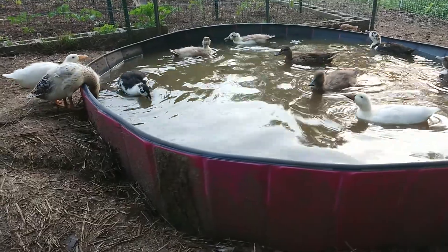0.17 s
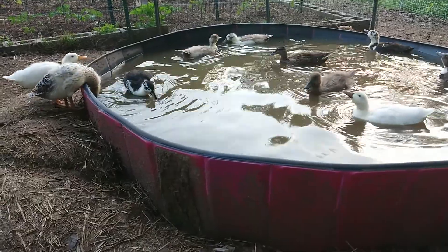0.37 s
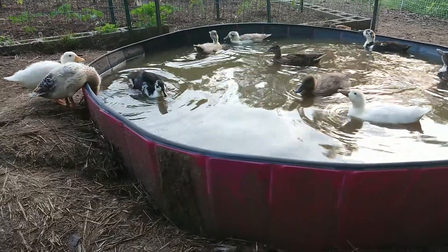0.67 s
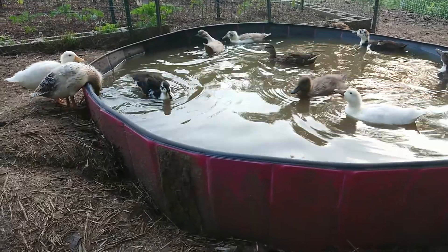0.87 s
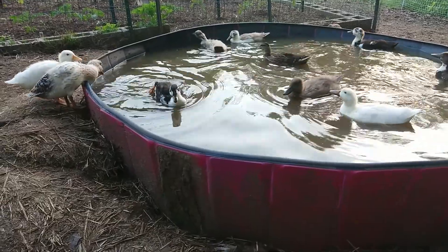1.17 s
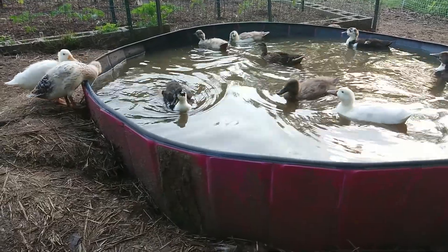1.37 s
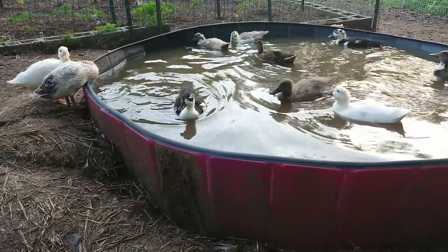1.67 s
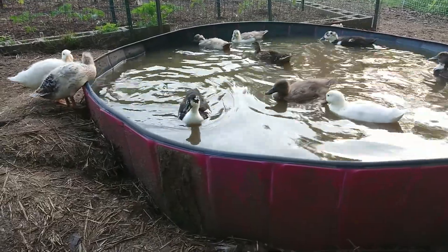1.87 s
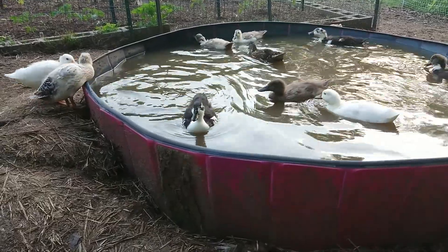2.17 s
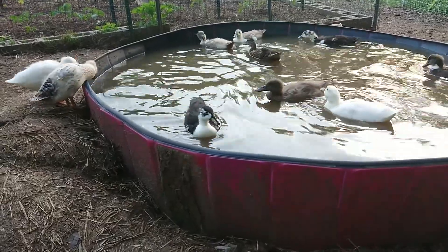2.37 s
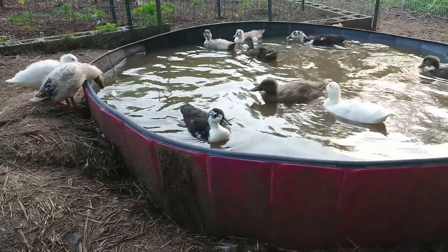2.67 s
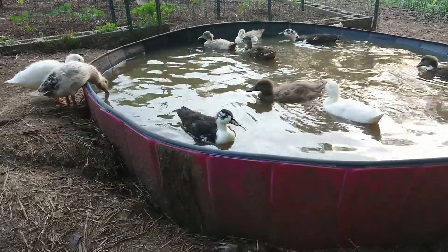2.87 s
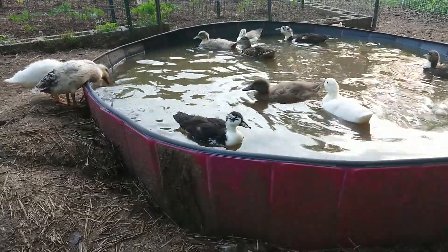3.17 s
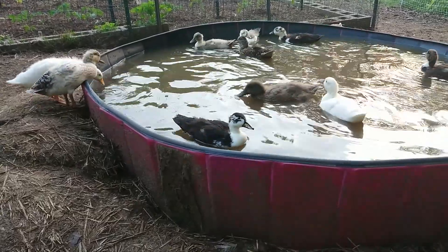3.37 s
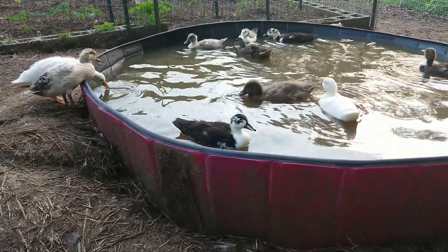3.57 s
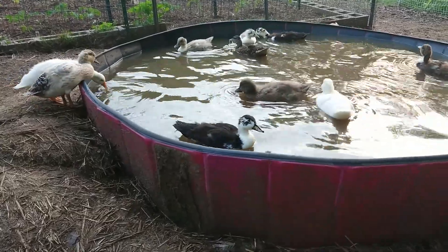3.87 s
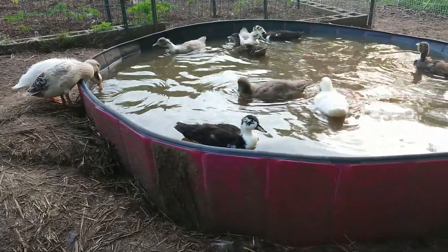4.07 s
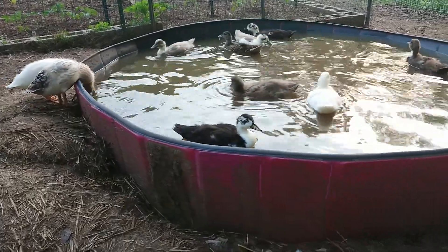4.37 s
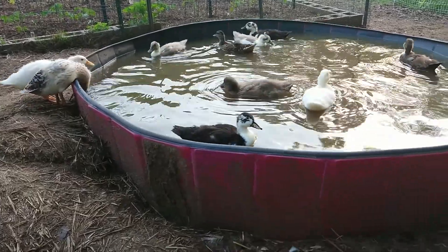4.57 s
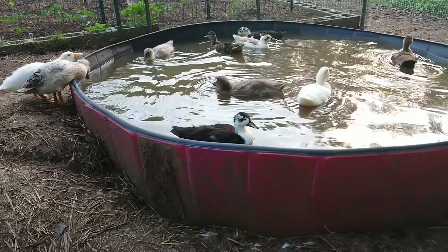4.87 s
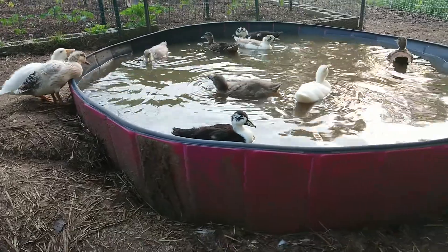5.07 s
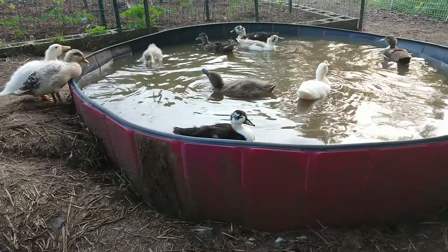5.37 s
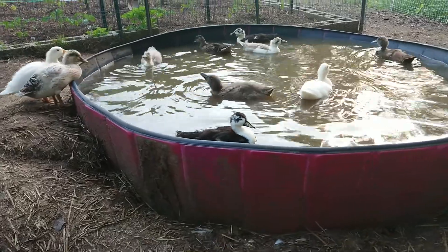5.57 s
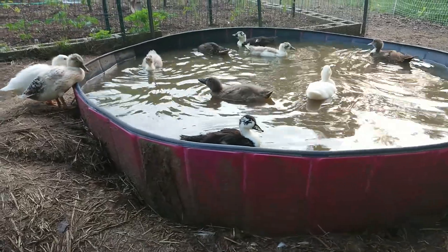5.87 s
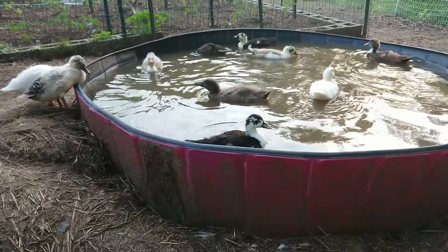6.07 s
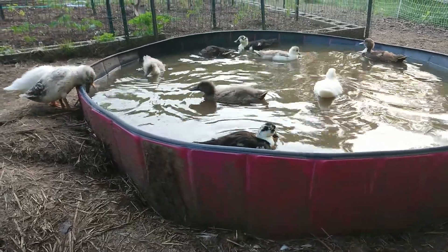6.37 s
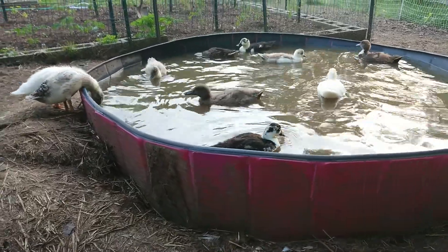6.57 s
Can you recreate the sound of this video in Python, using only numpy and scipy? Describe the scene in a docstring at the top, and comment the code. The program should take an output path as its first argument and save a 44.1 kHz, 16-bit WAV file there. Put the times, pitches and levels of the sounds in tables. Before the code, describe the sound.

Ducks paddle in a backyard pool: low nasal quacks, thin peeps, watery drips and plops, far birds twittering, a low hum and a distant engine passing.

```python
"""Ducks on a backyard pool. From the start a close duck quacks ten times while young ducks peep, water fizzes
and drips, feet stir up plops and far birds twitter, over a low hum, a rumble and a distant engine.
At 2.7 s a farther duck answers with a quick hoarse run, then clucks softly; a songbird trills from 3.4 s.
The engine speeds up after 2.5 s and is loudest near 3.8 s; a low bump follows at 4.1 s. The farther duck's
second run comes at 5 s. At 5.9 s the engine changes gear and climbs again in one short swell."""
import sys
import numpy as np
from scipy import signal
from scipy.fft import rfft, irfft, next_fast_len
from scipy.io import wavfile
from scipy.ndimage import uniform_filter1d

SR = 44100
rng = np.random.default_rng(int(sys.argv[2]) if len(sys.argv) > 2 else 0)


def wrap_up_sound(samples):
    """Save the sound to the file named by the first command line argument, as 16-bit audio."""
    columns = np.atleast_2d(samples).T
    # keep every value between -1 and 1, then stretch to whole-number steps
    tamed = np.clip(columns, -1, 1)
    steps = np.round(tamed * 32767).astype(np.int16)
    wavfile.write(sys.argv[1], SR, steps)


N = 296352
TIME = np.arange(N) / SR


def amp(db):
    """Decibels to gain."""
    return 10 ** (np.asarray(db) / 20)


def unit(x):
    """Scales to rms 1."""
    return x / np.sqrt(np.mean(x ** 2) + 1e-20)


def read(points, hz):
    """Reads a table on a log-frequency axis."""
    f, value = np.transpose(points)
    return np.interp(np.log(hz + 1), np.log(f + 1), value)


def over_time(points):
    """Joins the points of a (time, value) table with straight lines."""
    return np.interp(TIME, *np.transpose(points))


def progress(length):
    """Runs from 0 to 1 over a sound of the given length in seconds."""
    return np.arange(int(length * SR)) / (length * SR)


def phase_of(hz):
    """Adds up a changing pitch into the phase of its wave."""
    return 2 * np.pi * np.cumsum(hz) / SR


def add(mix, s, sound):
    """Mixes a sound in at time s, cutting what falls outside the scene."""
    at = round(s * SR)
    part = mix[max(at, 0):][:max(len(sound) + min(at, 0), 0)]
    part += sound[max(-at, 0):][:len(part)]


def drift(size, hz):
    """Slow random motion of rms 1, up to about hz."""
    span = next_fast_len(size + SR // 4, real=True)
    f = np.fft.rfftfreq(span, 1 / SR)
    smooth = irfft(rfft(rng.standard_normal(span)) * np.exp(-(f / hz) ** 2), span)
    return unit(smooth)[:size]


def above(x, hz):
    """Keeps what lies above hz."""
    return signal.sosfilt(signal.butter(2, hz, "high", fs=SR, output="sos"), x)


def resonate(x, hz, width):
    """A two-pole resonance of gain 1."""
    return signal.lfilter(*signal.iirpeak(hz, hz / width, fs=SR), x)


def glide(x, hz, width):
    """A resonance of gain 1 that follows the curve hz: shift down to zero, smooth, shift back."""
    turn = np.exp(1j * phase_of(hz))
    r = np.exp(-np.pi * width / SR)
    smoothed = signal.lfilter([1 - r], [1, -r], x / turn + 1e-18)
    return 2 * (turn * smoothed).real


def colour(x, points, tilt_db=0, size=2048):
    """Causal filter: every pulse rings with the given spectrum, tilted per octave."""
    hz = abs(np.fft.fftfreq(size, 1 / SR))
    octaves = np.log2(np.clip(hz, 300, 4000) / 1000)
    low_cut = (hz + 1) / np.hypot(hz, 120)
    log_gain = np.log(amp(read(points, hz) + tilt_db * octaves) * low_cut)
    # minimum phase: the ring starts at once and only dies away
    ring = np.fft.ifft(np.exp(np.conj(signal.hilbert(log_gain)))).real[:size // 2]
    return signal.fftconvolve(x, ring)


def scatter(x, decay_s):
    """Early echoes off the water and the pool wall, within 25 ms."""
    t = np.arange(SR // 40) / SR
    taps = rng.standard_normal(len(t)) * np.exp(-t / decay_s) * (t > .001)
    return signal.fftconvolve(x, taps / np.linalg.norm(taps))[:len(x)]


# how long the yard rings: (frequency [Hz], time to fall by 60 dB [s])
YARD_RING = [(200, 0.093), (450, 0.29), (720, 0.25), (950, 0.3), (1600, 0.19), (2700, 0.25), (5000, 0.5),
             (12000, 0.067)]


def yard(x):
    """Pool wall, fence and trees scatter the sound back to both ports."""
    taps = rng.standard_normal((2, SR // 2)) * (rng.random((2, SR // 2)) < .05)
    taps[:, :SR // 250] = 0  # no echo in the first 4 ms
    hz, t, z = signal.stft(taps, SR, nperseg=256)
    fade = amp(-60 * t / read(YARD_RING, hz)[:, None])
    tail = signal.istft(z * fade, SR, nperseg=256)[1]
    return signal.fftconvolve(x[None], tail / np.linalg.norm(tail[0]), axes=1)[:, :N]


def place(x, lead_ms, wet_db):
    """Sound reaches the left port earlier by lead_ms (later if negative); the yard adds its echo."""
    delay = np.exp(-2j * np.pi * np.fft.rfftfreq(N, 1 / SR) * lead_ms / 1000)
    right = irfft(rfft(x) * delay, N)
    return np.array([x, right]) + amp(wet_db) * yard(x)


# how alike sound from all around is at the two ports: (frequency [Hz], likeness [-1 to 1])
PORT_LIKENESS = [(60, 1), (300, 0.76), (700, 0.45), (1500, -0.31), (3000, -0.19), (5000, 0.77),
                 (9000, -0.15)]


def diffuse(points, patchy_db, size=1024):
    """Noise from all around, with drifting patches in time and frequency."""
    frames, hz = N // (size // 4) + 5, np.fft.rfftfreq(size, 1 / SR)
    a, b, c, d, patches = rng.standard_normal((frames, size // 2 + 1, 5)).T
    patches = uniform_filter1d(patches, size=7, axis=0)
    patches = unit(uniform_filter1d(patches, size=6, axis=1))
    same = np.clip(read(PORT_LIKENESS, hz), -1, 1)[:, None]
    left, other = a + 1j * b, c + 1j * d
    z = np.array([left, same * left + np.sqrt(1 - same ** 2) * other])
    z *= amp(read(points, hz)[:, None] + patchy_db * patches)
    return unit(signal.istft(z, nperseg=size, noverlap=size * 3 // 4)[1][:, :N])


def engine(overtone_db=-8):
    """One droning tone that nears, speeds up, fades, and after a gear change climbs again with its octave."""
    # it holds its pitch, then speeds up ever faster
    start_hz, speed_up_s, speed_up_hz_per_s2 = 168.4, 2.5, 3.95
    hz = start_hz + speed_up_hz_per_s2 * np.maximum(TIME - speed_up_s, 0) ** 2
    # it is loudest as it passes
    pass_s, pass_db, nearing_db_per_s, leaving_db_per_s = 3.79, -49, 6.5, 7
    db = pass_db - np.maximum(nearing_db_per_s * (pass_s - TIME), leaving_db_per_s * (TIME - pass_s))
    # it eases off before the gear change
    ease_s, ease_db_per_s = 5.4, 17.5
    db = db - ease_db_per_s * np.maximum(TIME - ease_s, 0)
    # then it climbs again from lower down in one short swell
    shift_s, shift_hz, climb_hz_per_s, climb_db = 5.9, 109, 100, -62
    since = TIME - shift_s
    phase = phase_of(np.where(since < 0, hz, shift_hz + climb_hz_per_s * since))
    gain = np.where(since < 0, amp(db), amp(climb_db) * np.sin(np.pi * since / since[-1]))
    tone = unit(np.sin(phase)) + amp(overtone_db) * (since > 0) * unit(np.sin(2 * phase))
    return uniform_filter1d(gain, size=2000) * amp(1.2 * drift(N, 19)) * tone


# tone colour of the quiet garden air, with the narrow band near 4.3 kHz: (frequency [Hz], relative level [dB])
GARDEN_COLOUR = [(350, -6.5), (600, -3.5), (1200, -3.5), (2200, -9), (3600, -15), (4300, 7), (4800, -5),
                 (5400, -2), (6200, -59), (7200, -47), (9000, -79.5), (13000, -89.5), (16000, -52)]
# tone colour of the low rumble: (frequency [Hz], relative level [dB])
RUMBLE_COLOUR = [(15, -61), (30, -32), (45, -24), (64, 1.5), (85, -1.5), (108, 0.5), (140, -5), (220, -9.5),
                 (300, -16.5), (450, -19.5), (900, -48.5)]


def background(garden_db=-62, rumble_db=-58.5, easing_db_per_s=0.25, hum_db=-67, hum_hz=65):
    """Garden air and a narrow strong band near 4.3 kHz, an easing rumble, a wavering hum and the far engine."""
    hum = unit(np.sin(phase_of(hum_hz + 2.56 * drift(N, 7.8))))
    hum = amp(hum_db + 2.2 * drift(N, 5.5)) * hum
    rumble = diffuse(RUMBLE_COLOUR, patchy_db=2.5, size=4096)
    rumble = amp(rumble_db - easing_db_per_s * TIME) * rumble
    air = amp(garden_db) * diffuse(GARDEN_COLOUR, patchy_db=2)
    return air + rumble + place(engine() + hum, lead_ms=-0.51, wet_db=-10.0)


# a far bird's phrases: (time [s], level [dB])
BIRD_PHRASES = [(.02, -50.5), (.41, -58.5), (.865, -53), (1.355, -51), (1.695, -53), (2.395, -51.5),
                (2.94, -51.5), (3.25, -51), (3.69, -53), (4.8, -57), (5.39, -53), (5.755, -51.5),
                (6.1, -51), (6.495, -52.5)]
# where each of the three chirps in a phrase starts its fall: (pitch [Hz])
CHIRP_STARTS = [5010, 5140, 5170]


def twitter(crowd_db=-63, crowd_hz=4900, fall_hz=560, length=0.0339):
    """Far birds: one repeats phrases of three falling chirps, over a crowd whose chirps blur into a shimmer."""
    chirp_gap_s, crowd_per_s = .046, 45
    u = progress(length)
    leader, crowd = np.zeros((2, N))

    def chirp(hz):
        """One short falling note that swells and fades."""
        pitch = hz - fall_hz * u + 45 * drift(len(u), 400)
        return np.sin(phase_of(pitch)) * np.sin(np.pi * u) ** 2

    for s, db in BIRD_PHRASES:
        for k, hz in enumerate(CHIRP_STARTS):
            add(leader, s + k * chirp_gap_s, amp(db) * chirp(hz))
    chances = rng.uniform(-1, 1, (int(crowd_per_s * N / SR), 3))
    for k, (late, high, loud) in enumerate(chances):
        add(crowd, (k + late / 2) / crowd_per_s, amp(3 * loud) * chirp(crowd_hz + 250 * high))
    crowd = amp(crowd_db + 2 * drift(N, 4.6)) * unit(place(crowd, lead_ms=0, wet_db=0.5))
    return place(leader, lead_ms=-0.026, wet_db=-5.5) + crowd


# one note of the songbird: (time into the note [s], pitch [Hz], level relative to the trill [dB])
TRILL_NOTE = [(0, 5500, -41), (.012, 6100, -7), (.026, 7000, 0), (.038, 7600, -24), (.05, 6500, -16),
              (.06, 5450, 3.5), (.075, 4850, 10), (.092, 4500, -16)]


def songbird(start=3.417, period=.104, count=14):
    """One up-and-down whistle repeated evenly; the trill swells almost to its last note."""
    trill_db, full_s, swell_db_per_s = -53, 4.67, 8
    at, hz, db = np.transpose(TRILL_NOTE)
    t, out = np.arange(0, at[-1], 1 / SR), np.zeros(N)
    for s in start + period * np.arange(count):
        note = np.sin(phase_of(np.interp(t, at, hz) * (1 + 0.0044 * drift(len(t), 102))))
        level_db = trill_db - swell_db_per_s * max(full_s - s, 0)
        add(out, s, amp(np.interp(t, at, db) + level_db) * note)
    return place(out, lead_ms=-0.097, wet_db=-8)


def bump(s=4.08, length=0.12, hz=98, db=-47):
    """One soft, low bump: a short tone that swells and fades."""
    out, t = np.zeros(N), np.arange(int(length * SR)) / SR
    add(out, s, amp(db) * np.sin(2 * np.pi * hz * t) * np.hanning(len(t)))
    return out


# how hard the water is stirred, before its layers get their own levels: (time [s], level [dB])
WATER_STIR = [(0, -61.5), (.15, -67.5), (.7, -72), (1.35, -67.5), (1.6, -72.5), (2.2, -66.5), (2.75, -69.5),
              (2.98, -66.5), (3.25, -68.5), (3.6, -72.5), (4, -68.5), (4.9, -71.5), (5.25, -70.5),
              (5.8, -77.5), (6.72, -73)]
# tone colour of the stirred water: (frequency [Hz], relative level [dB])
WATER_COLOUR = [(400, -6.5), (1000, -11), (2500, -1), (3700, -3), (4700, -8), (6200, -20.5), (7500, -16),
                (9500, -20.5), (13000, -12.5), (16000, -28)]
# tone colour of spray, used for droplets here and for drips below: (frequency [Hz], relative level [dB])
SPRAY_COLOUR = [(300, -6), (1200, -12), (2800, 1), (4700, 2.5), (6300, -12.5), (9000, -17.5), (13000, -14),
                (16000, -39)]


def water(fizz_db=10, patter_db=2, crackle_db=-8):
    """Paddling and dabbling: a smooth wash, tiny droplets and now and then a sharp little crackle."""
    surge_db, surges_hz = 2.5, 9.7  # the stirring comes in uneven surges
    stir = amp(over_time(WATER_STIR) + surge_db * drift(N, surges_hz))
    wash = diffuse(WATER_COLOUR, patchy_db=2)
    # about 70 droplets a second, a few of them much louder
    drops = (rng.random(N) < 70 / SR) * amp(6.4 * np.minimum(rng.exponential(1, N), 3))
    burst = rng.standard_normal(SR // 200) * np.exp(-np.arange(SR // 200) / 30)
    patter = unit(colour(signal.fftconvolve(drops, burst), SPRAY_COLOUR)[:N])
    # about 6 crackles a second
    pops = (rng.random(N) < 6 / SR) * amp(rng.uniform(-14, 0, N))
    crackle = unit(above(signal.fftconvolve(pops, burst)[:N], 7000))
    near = place(amp(patter_db) * patter + amp(crackle_db) * crackle, lead_ms=0, wet_db=-12)
    return stir * (amp(fizz_db) * wash + near)


def plops(per_s=6, level_db=-52, low_hz=380, high_hz=1500, cycles=7, rise=6):
    """Paddling feet trap larger bubbles: soft, low blips that rise as they die."""
    out, t = np.zeros(N), np.arange(SR // 16) / SR
    for k, (late, high, soft) in enumerate(rng.random((int(per_s * N / SR), 3))):
        hz = low_hz * (high_hz / low_hz) ** high
        fade = np.exp(-t * hz / cycles) * np.minimum(t * hz / 2, 1)
        ring = np.sin(2 * np.pi * hz * (t + rise * t ** 2)) * fade
        add(out, (k + 2 * late - 1) / per_s, amp(level_db - 10 * soft) * ring)
    return place(out, lead_ms=0, wet_db=-3.5)


# drops striking the water: (time [s], level [dB], bubble pitch at first [Hz])
WATER_DRIPS = [(0.239, -29.5, 4490), (0.719, -37, 6160), (1.158, -28.5, 900), (1.163, -34, 1130),
               (1.555, -33, 4290), (1.622, -36, 4230), (1.953, -34.5, 3490), (2.159, -28, 4700),
               (2.346, -35.5, 3800), (2.535, -31, 4290), (3.549, -47, 3640), (3.847, -30, 4910),
               (4.04, -39, 3000), (4.311, -41, 1330), (4.381, -29.5, 4000), (4.447, -36, 3700),
               (4.855, -36.5, 4220), (4.858, -43.5, 910), (4.947, -37, 4430), (4.986, -39.5, 4900),
               (5.02, -39, 4060), (6.5, -41, 4840), (6.54, -44, 3240), (6.605, -40, 2800)]
# bills flicking water: (time [s], level [dB], time to fall by 60 dB [s])
BILL_SPLASHES = [(.52, -29, 0.055), (1.158, -39.5, 0.26), (3.055, -38, .05), (3.549, -42, 0.17),
                 (4.22, -39.5, 0.046), (4.908, -28, 0.0062)]


def drips(rise=2.1, tick_db=-11):
    """Each strike ticks, traps a bubble that rings and rises in pitch, and throws a little spray."""
    drip_t60_s, drip_spray_db = 0.014, -4.5
    splash_hz, splash_spray_db = 4250, 10
    out, t = np.zeros(N), np.arange(SR // 8) / SR
    strikes = [(s, db, hz, drip_t60_s, drip_spray_db) for s, db, hz in WATER_DRIPS]
    strikes += [(s, db, splash_hz, t60, splash_spray_db) for s, db, t60 in BILL_SPLASHES]
    for s, db, hz, t60, spray_db in strikes:
        fade = amp(-60 * t / t60) * (1 - np.exp(-t / 0.000097))
        spray = unit(colour(rng.standard_normal(len(t)), SPRAY_COLOUR)[:len(t)]) / 2
        bubble = np.sin(2 * np.pi * hz * (t + rise * t ** 2))
        tick = rng.standard_normal(len(t)) * np.exp(-t / 0.000064)
        strike = fade * (bubble + amp(spray_db) * spray) + amp(tick_db + spray_db) * tick
        add(out, s, amp(db) * strike / np.hypot(1, amp(spray_db)))
    return place(out, lead_ms=0.039, wet_db=-18.5)


# young ducks' arched peeps: (time [s], length [s], top pitch [Hz], level [dB], warble strength [0-1])
YOUNG_PEEPS = [(-.01, 0.048, 3300, -46, 0.15), (0.102, 0.05, 1945, -55, 0.014),
               (0.26, 0.054, 3160, -42.5, 0.18), (0.524, 0.056, 2970, -43.5, 0.18),
               (0.821, 0.056, 3114, -44, 0.26), (1.088, 0.055, 2970, -44.5, 0.16),
               (1.363, 0.057, 3104, -42.5, 0.13), (1.649, 0.053, 3090, -45.5, 0.19),
               (1.866, 0.078, 2866, -48, 0.2), (2.194, 0.048, 2870, -51.5, 0.17),
               (2.474, 0.061, 2523, -51, 0.16), (3.125, 0.053, 2666, -51, 0.1),
               (3.448, 0.057, 2590, -51.5, 0.11), (3.8, 0.017, 1950, -58.5, 0.26),
               (3.836, 0.059, 2380, -55, 0.11), (3.973, 0.057, 2820, -56, 0.03),
               (4.199, .058, 2303, -55, 0.17), (4.29, .032, 1497, -58, 0.3),
               (4.565, 0.056, 2345, -55, 0.097), (4.991, 0.045, 2170, -56, 0.12),
               (5.422, 0.066, 2436, -52.5, 0.07), (5.893, 0.037, 2080, -65, 0.21),
               (6.44, 0.048, 1990, -65, 0.11), (6.628, .016, 1800, -55.5, 0.31),
               (6.629, 0.082, 2620, -56.5, 0.039)]
# their thin whistles: (time [s], pitch [Hz], level [dB], end pitch [share of that pitch])
YOUNG_WHISTLES = [(3.768, 2750, -56.5, 0.97), (3.933, 2750, -58, 0.96), (4.361, 2890, -53, 0.99),
                  (4.401, 3165, -52.5, 0.76), (4.44, 2640, -60, 1)]


def young_ducks(warble_hz=115, overtone_db=-20, throat_hz=2880, throat_width=1000, leak_db=-14, swell=0.73):
    """Arched whistles, most chopped into hoarse bursts by a second membrane; soft ones escape the throat more."""
    peep_from, peep_to = .64, .58  # start and end, as shares of the top pitch
    whistle_s, whistle_from = 0.046, 1.02
    # fully squeezed above this level; each dB softer lets so many dB more past the throat resonance
    squeezed_db, loosen_per_db = -46, 1.8
    out = np.zeros(N)
    calls = [(*row, peep_from, peep_to) for row in YOUNG_PEEPS]
    calls += [(s, whistle_s, hz, db, 0, whistle_from, last) for s, hz, db, last in YOUNG_WHISTLES]
    for s, length, top, db, warble, first, last in calls:
        u = progress(length)
        edge = first + (last - first) * u
        pitch = top * (edge + (1 - (first + last) / 2) * np.sin(np.pi * u) ** 1.5)
        shake = np.sin(phase_of(warble_hz * (1 + 0.294 * drift(len(u), 144))))
        wobble = .6 * shake + .45 * drift(len(u), 950)
        phase = phase_of(pitch * (1 + warble * wobble))
        air = unit(resonate(rng.standard_normal(len(u)), top, top / 2))
        tone = np.sin(phase) + amp(overtone_db) * np.sin(2 * phase) + 2.5 * warble * air
        tone = tone * np.exp(-5 * warble * shake) * np.sin(np.pi * u) ** swell
        throat = resonate(resonate(tone, throat_hz, throat_width), throat_hz, throat_width)
        leak = amp(leak_db + loosen_per_db * max(squeezed_db - db, 0)) * tone
        add(out, s, amp(db) * unit(throat + leak))
    return place(out, lead_ms=0.066, wet_db=-12.0)


def syrinx(length, hz, rasp, arch, crest, jitter):
    """Membranes snap once a cycle on an arch of pitch; each snap lets out a puff of air."""
    u = progress(length)
    pitch = hz * (1 - arch * (u - crest) ** 2) * (1 + jitter * drift(len(u), 200))
    turns = np.cumsum(pitch) / SR + .5
    snaps = np.diff(np.floor(turns), prepend=0)
    air = (.1 + np.exp(-(turns % 1) / .3)) * rng.standard_normal(len(u))
    rasp = np.clip(rasp, 0, 1)
    return u, (1 - rasp) * unit(snaps), rasp * unit(air)


# the farther duck's soft clucks:
# (time [s], length [s], first pitch [Hz], middle pitch [Hz], last pitch [Hz], level [dB])
SOFT_CLUCKS = [(3.31, .05, 306, 241, 175, -46.5), (3.425, 0.021, 400, 353, 327, -62.5),
               (3.692, 0.033, 397, 394, 490, -61.5), (3.83, 0.015, 380, 397, 484, -56),
               (3.984, 0.026, 378, 404, 503, -65.5), (4.132, 0.032, 412, 374, 400, -59.5),
               (4.852, 0.024, 323, 330, 373, -59), (4.934, 0.056, 490, 398, 503, -57),
               (5.567, 0.025, 310, 268, 219, -57)]


def clucks(overtone_fall_db=11):
    """With the bill shut only a soft, almost pure note comes out, bending as it goes."""
    out = np.zeros(N)
    for s, length, first, middle, last, db in SOFT_CLUCKS:
        u = progress(length)
        bend = np.polyval(np.polyfit([0, .5, 1], [first, middle, last], 2), u)
        phase = phase_of(bend * (1 + .02 * drift(len(u), 200)))
        # the overtones fall by so many dB per octave
        overtones = sum(amp(-overtone_fall_db * np.log2(k)) * np.sin(k * phase) for k in range(2, 7))
        tone = np.sin(phase) + overtones
        add(out, s, amp(db) * unit(tone * np.sin(np.pi * u)))
    return out


# the farther duck's quacks: (time [s], length [s], top pitch [Hz], level [dB],
# brightness of the quack, voice and breath [dB per octave], ring of the bill [Hz], its strength [dB],
# nasal tone [dB])
FAR_QUACKS = [(2.665, 0.055, 384.2, -38.5, 2.5, 3280, 0, -3), (2.766, 0.051, 386, -40.5, 2.7, 1440, 1, -20),
              (2.855, 0.053, 385.4, -41, 2, 1470, 1.5, -11), (2.943, 0.05, 375, -42.5, 0.5, 1800, -5, -8),
              (3.035, 0.05, 353.4, -44.5, -0.5, 1070, 1, -21), (3.134, 0.048, 312, -45, -3, 310, -7, -14),
              (3.213, 0.062, 328, -47, -3, 2360, 5.5, -14), (5.023, 0.051, 386.5, -46, -0.5, 2700, 5, 4.5),
              (5.112, 0.049, 373, -45, -0.5, 1080, -22, -12),
              (5.193, 0.06, 376.6, -45.5, -0.2, 1510, -19, -23),
              (5.273, 0.061, 374.2, -44, -0.3, 1950, -5, -17), (5.372, 0.07, 340, -45, -1, 1740, -1, -15),
              (5.462, 0.062, 332, -46, -2.5, 2370, 10.5, -14),
              (5.557, .06, 285.4, -56.5, 2.5, 1150, -2, -11)]
# tone colour of its throat: (frequency [Hz], relative level [dB])
FAR_THROAT_COLOUR = [(330, 1), (520, -7), (750, 1.5), (1050, -1.5), (1550, 4.5), (2350, -1.5), (2800, -3),
                     (3800, -1.5), (4600, 1.5), (5500, -11.5), (6200, -18.5), (7200, -16.5), (9000, -29),
                     (13000, -54), (16000, -97)]
# its second run is more echoing: (time [s], echo level [dB])
FAR_ECHO_LEVEL = [(3.3, -9), (5, -7.5)]
# bands that ring on in the yard after its calls: (frequency [Hz], width [Hz], level [dB])
FAR_YARD_RING = [(743, 120, -4.5), (928, 65, -1.5), (2640, 460, 1)]


def far_duck(hiss_hz=2500, hiss_db=1, nose_hz=750, nose_width=110, bill_width=380):
    """Higher quacks in quick runs: each swells on an arch of pitch and is cut off; clear below, hoarse on top."""
    # the harder it pushes, the hoarser it gets: rasp (0-1) at the usual level, and more for each dB above
    usual_db, usual_rasp, rasp_per_db = -43.5, .34, .05
    out = np.zeros(N)
    for s, length, hz, db, bright_db, bill_hz, bill_db, nose_db in FAR_QUACKS:
        rasp = usual_rasp + rasp_per_db * max(db - usual_db, 0)
        u, snaps, air = syrinx(length, hz, rasp, arch=1.05, crest=.5, jitter=.009)
        effort = amp(np.interp(u, [0, .25, .55, .82, 1], [-5, 3.5, 6, 5, -4]))
        # the clear voice is a little duller than the breath
        clear = colour(snaps * effort, FAR_THROAT_COLOUR, bright_db - 2.5)
        hiss = above(above(air, hiss_hz), hiss_hz)
        voice = clear + amp(hiss_db) * colour(hiss * effort, FAR_THROAT_COLOUR, bright_db)
        nose = amp(nose_db) * resonate(voice, nose_hz, nose_width)
        bill = amp(bill_db) * resonate(voice, bill_hz, bill_width)
        voice = voice + nose + bill
        voice = voice + .7 * above(above(scatter(voice, .005), 2400), 2400)
        add(out, s, amp(db) * voice / np.std(voice[:len(u)]))
    out = out + clucks()
    ringing = sum(amp(db) * resonate(out, hz, width) for hz, width, db in FAR_YARD_RING)
    return place(out, lead_ms=-0.322, wet_db=over_time(FAR_ECHO_LEVEL)) + yard(ringing)


# the near duck's quacks: (time [s], length [s], top pitch [Hz], level [dB],
# nasal resonance [Hz], its strength [dB], ring of the bill [dB], chest tone [dB])
NEAR_QUACKS = [(-.035, 0.078, 201.4, -39, 1970, 8, 9.5, 13), (0.232, 0.085, 209.2, -40.5, 1430, 0, 5, 11),
               (0.514, 0.096, 200.3, -40, 1920, 13, 7, 11), (.802, 0.089, 201, -39.5, 1970, 8.5, 7.5, 3.5),
               (1.071, 0.087, 202.8, -37.5, 1900, 12.5, 12, 6),
               (1.448, 0.083, 195.8, -39, 1880, 11, 7.5, 6),
               (1.707, 0.085, 206.3, -39.5, 1490, 7.5, 10.5, 4),
               (1.984, 0.072, 202.5, -35, 1945, 19.5, 14, 8), (2.276, 0.075, 202, -36, 1940, 17, 14, 6),
               (2.571, 0.083, 193, -38.5, 1860, 10.5, 14.5, 7.5)]
# tone colour of its throat: (frequency [Hz], relative level [dB])
NEAR_THROAT_COLOUR = [(170, -9), (650, -2), (1000, -12), (1350, 2), (1600, -4), (1950, -1.5), (2500, -6.5),
                      (3000, -12.5), (3900, -15), (4700, -6), (6200, -22), (7400, -19), (9500, -38.5),
                      (13000, -31), (16000, -64)]


def near_duck(nasal_width=200, bill_hz=2340, bill_width=220, hiss_hz=1900, chest_hz=195, chest_width=130,
              jaw_hz=625, jaw_width=170, jaw_db=-1, murmur_db=-17, murmur_hz=780):
    """Dry, pulsing quacks led in by a murmur; two sharp resonances hold, then sag as the bill closes."""
    rasp = .11
    # the bill holds for this share of the quack; then two resonances sag and the jaw's rises by these shares
    bill_hold, bill_sag, jaw_rise = 0.42, 0.2, .24
    out = np.zeros(N)
    for s, length, hz, db, nasal_hz, nasal_db, bill_db, chest_db in NEAR_QUACKS:
        u, snaps, air = syrinx(length, hz, rasp, arch=.9, crest=.36, jitter=.012)
        shimmer_db = 1.3 * drift(len(u), 120)
        effort = amp(np.interp(u, [0, .12, .36, .68, 1], [-5.5, -.5, 1, -2.5, -15]) + shimmer_db)
        voice = colour((snaps + 2 * above(air, hiss_hz)) * effort, NEAR_THROAT_COLOUR)
        voice = voice + .2 * above(scatter(voice, .0033), 1000)
        after_hold = (np.arange(len(voice)) / len(u) - bill_hold) / (1 - bill_hold)
        closing = np.clip(after_hold, 0, 1) ** 2.0
        mouth = 1 - bill_sag * closing
        # the low tones hold on while the bill closes
        held = colour(snaps * np.sqrt(effort), NEAR_THROAT_COLOUR)
        chest = amp(chest_db) * resonate(held, chest_hz, chest_width)
        jaw = amp(jaw_db) * glide(held, jaw_hz * (1 + jaw_rise * closing), jaw_width) * (1 + closing)
        nasal = amp(nasal_db) * glide(voice, nasal_hz * mouth, nasal_width)
        bill = amp(bill_db) * glide(voice, bill_hz * mouth, bill_width)
        voice = voice + chest + jaw + nasal + bill
        add(out, s, amp(db) * voice / np.std(voice[:len(u)]))
        # the throat murmurs softly just before the bill opens
        u, snaps, air = syrinx(0.028, .85 * hz, .5, arch=.4, crest=.5, jitter=.04)
        muffle = signal.butter(4, [250, murmur_hz], "band", fs=SR, output="sos")
        murmur = signal.sosfilt(muffle, np.pad((snaps + air) * np.sqrt(u), (0, SR // 100)))
        murmur = unit(murmur + resonate(murmur, jaw_hz, jaw_width))
        add(out, s - .024, amp(db + murmur_db) * murmur)
    return place(out, lead_ms=0.26, wet_db=-10.5)


def scene():
    """All sources at the two ports."""
    ducks = near_duck() + far_duck() + young_ducks()
    birds = songbird() + twitter()
    pool = drips() + water() + plops()
    return ducks + birds + pool + background() + bump()


# how the two microphone ports differ: (frequency [Hz], left minus right [dB])
PORT_LEAN = [(60, -4.5), (600, -4.5), (1400, -8.5), (2000, -6.5), (2700, -10), (3700, -10), (4500, -7),
             (5300, -14.5), (5800, -17), (6400, 3), (7500, -7), (9000, 3), (11200, 8), (14000, 1.5)]


def record(dry, edge_hz=15900):
    """Each port colours the sound in its own way; then everything above edge_hz is cut."""
    lean_db = read(PORT_LEAN, np.fft.rfftfreq(N, 1 / SR)) / 2
    heard = irfft(rfft(dry) * amp([lean_db, -lean_db]), N)
    low_pass = signal.firwin(511, edge_hz, window=("kaiser", 9), fs=SR)
    return signal.oaconvolve(heard, low_pass[None], "same")


dry = scene()
out = record(dry)
wrap_up_sound(out)
```